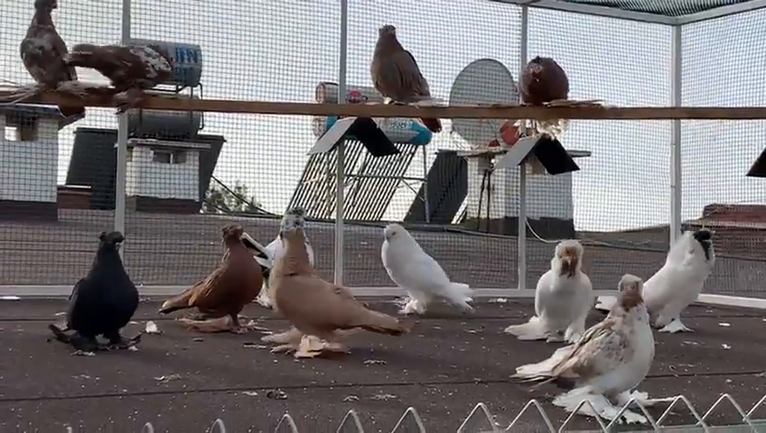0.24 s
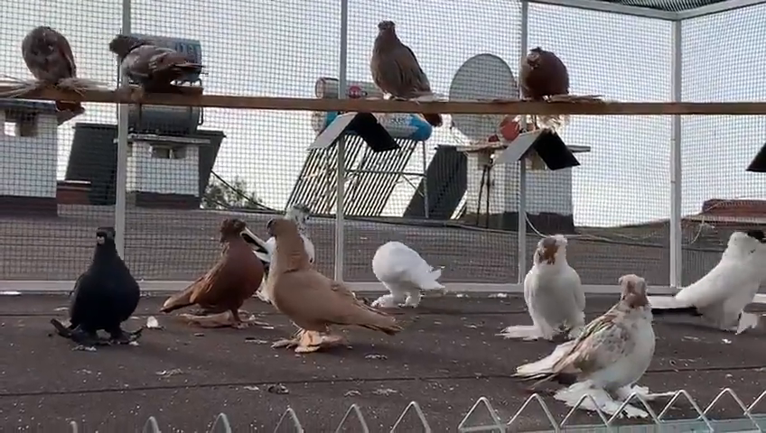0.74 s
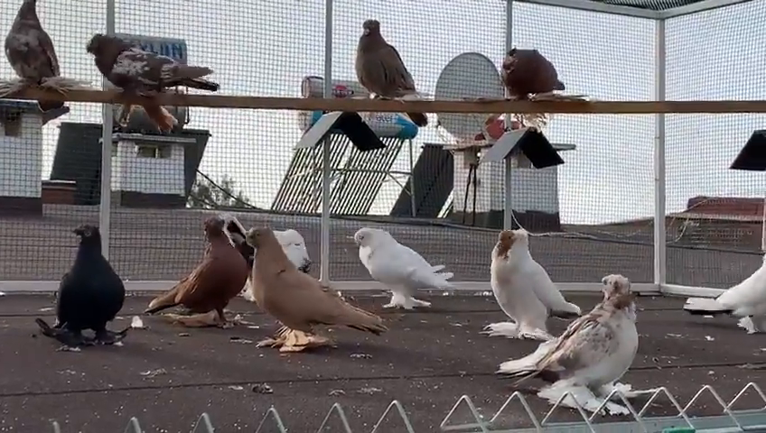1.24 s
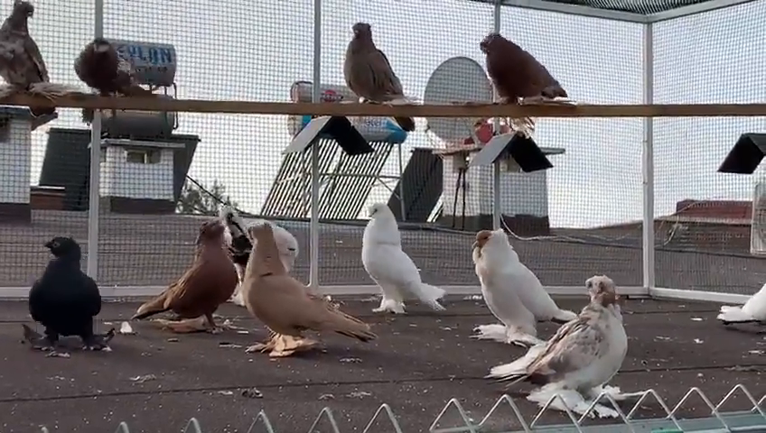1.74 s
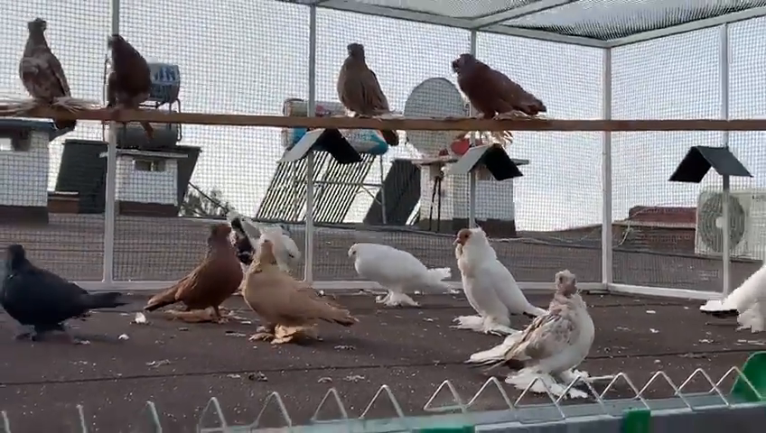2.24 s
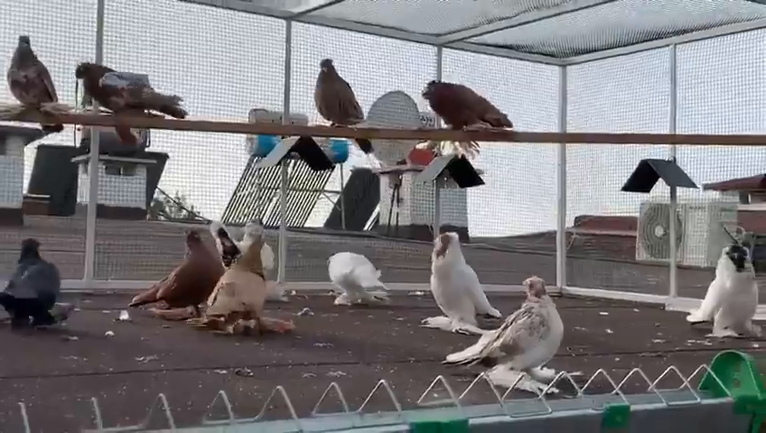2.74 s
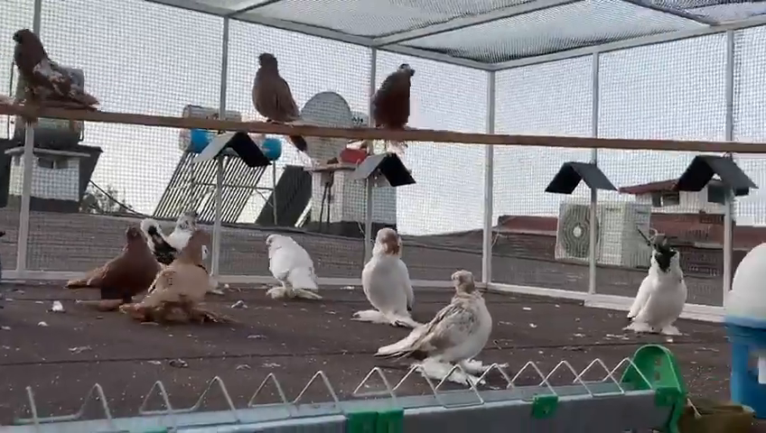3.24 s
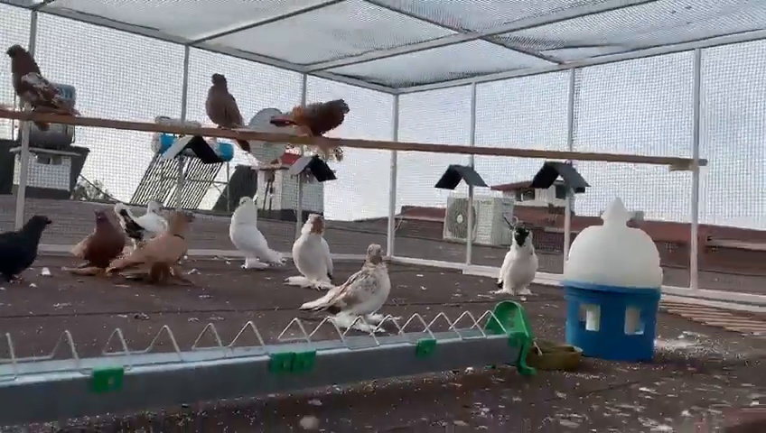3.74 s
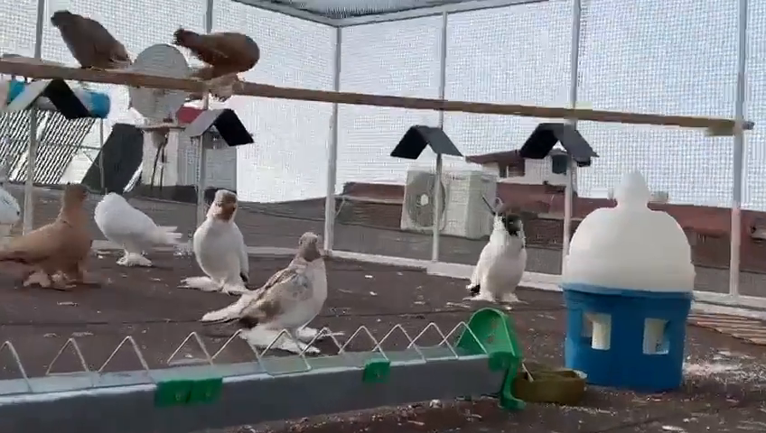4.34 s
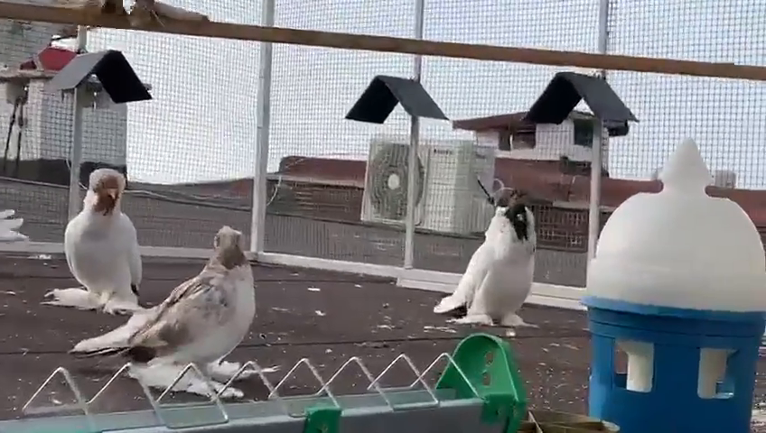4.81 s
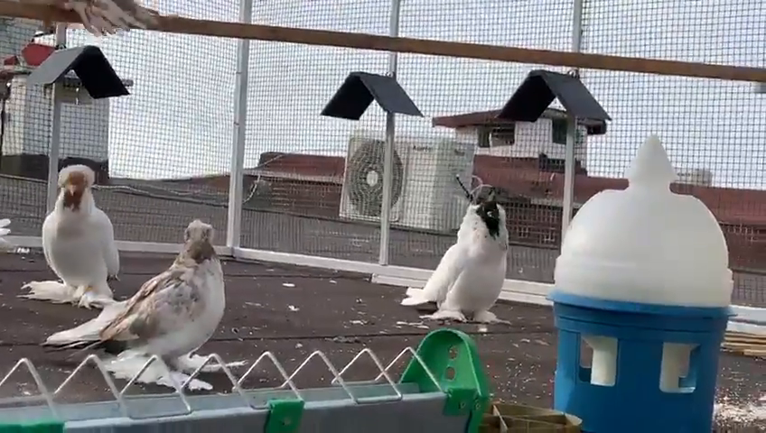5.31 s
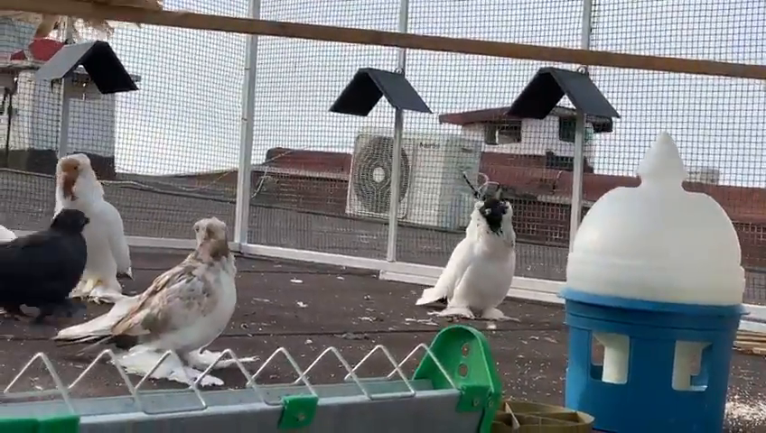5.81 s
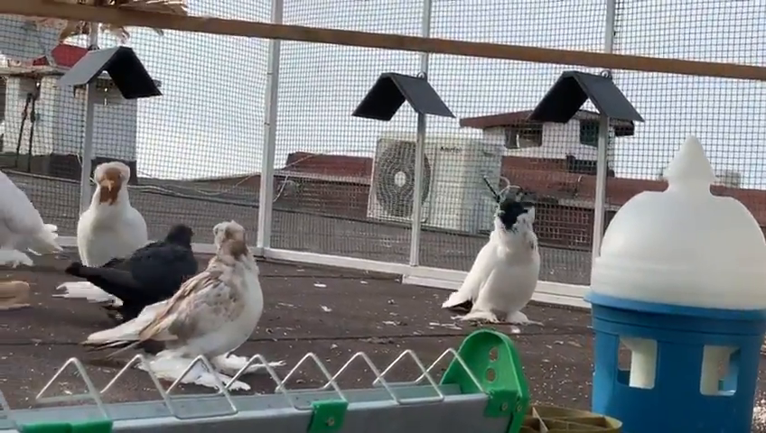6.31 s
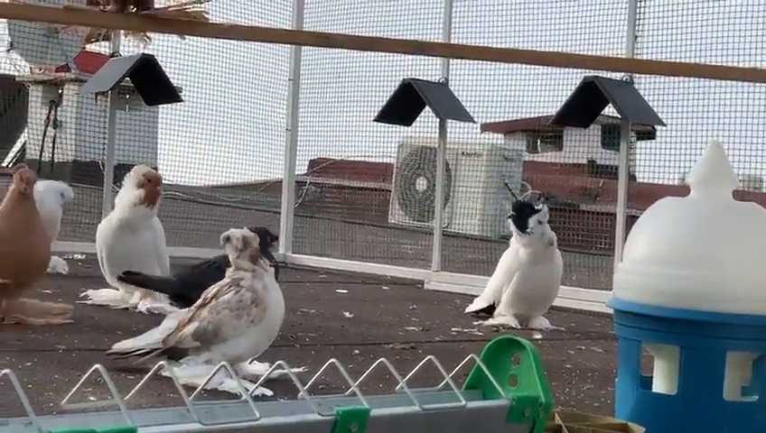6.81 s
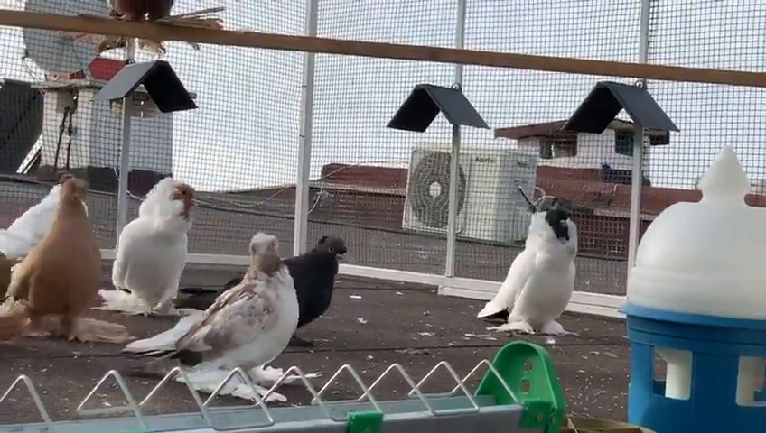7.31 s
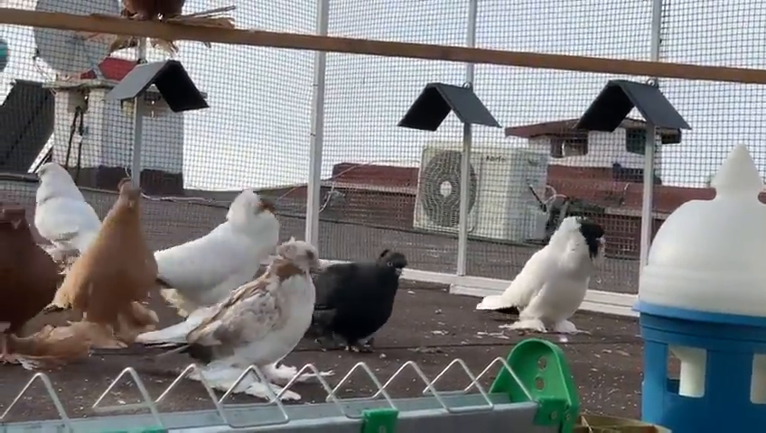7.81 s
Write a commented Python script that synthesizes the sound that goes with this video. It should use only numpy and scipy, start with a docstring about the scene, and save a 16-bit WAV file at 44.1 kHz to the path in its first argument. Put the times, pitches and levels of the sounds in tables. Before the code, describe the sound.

Pigeons coo close to a stereo microphone in a wire-mesh loft on a flat roof, with a town humming steadily below. A small bird chirps sharply at the start, off to the right among hard walls. From about 0.3 seconds claws tick faintly on the roofing and the cooing begins: short throat pulses and trembling, falling notes inside a rough, blurred murmur. Air softly thumps the microphone at 1.1 seconds, and the pulses run together into a rolling coo. One bird gives a brief, hoarse, rising squawk at 2.2 seconds. The cooing goes on in bouts to the end, with more rolls near 3.3, 5.4 and 7.6 seconds, the first two the strongest. A bright chirp stands out at 4.4 seconds and a weaker one at 5.5. Feet tap dully on the perch around 1.7, 2.9, 7 and 8 seconds, amid faint feather rustles and distant whistles.

```python
"""A wire-mesh pigeon loft on a flat roof, in stereo, close to the birds. From the start the town hums below
and small birds chirp among hard walls off to the right. Claws tick on the roofing, then the near pigeons coo:
short throat pulses and falling glides from the swollen crop, with a rough, blurred murmur around them.
A second in, air thumps the microphone and pulses run together into the first roll. Feet knock on the perch,
one bird squawks just after two seconds, and the cooing goes on in bouts to the end."""
import sys
import numpy as np
from scipy import signal
from scipy.fft import rfft, irfft
from scipy.io import wavfile

SR = 44100
rng = np.random.default_rng(int(sys.argv[2]) if len(sys.argv) > 2 else 0)


def put_to_file(sound):
    """Save the sound as 16-bit audio at rate SR, in the file named by the first command-line argument."""
    columns = np.atleast_2d(sound).T  # one column per channel
    safe = np.clip(columns, -1, 1)
    whole_steps = np.round(safe * 32767)
    wavfile.write(sys.argv[1], SR, whole_steps.astype(np.int16))


N = 355446

# the crop passes the octave of a low note and muffles that of a high one: octave_hz, gain_db
CROP_RESPONSE = [(400, -7), (500, -5.5), (600, -28.5), (720, -40), (820, -36), (1000, -53.5)]


def from_db(db):
    """Decibels to gain."""
    return 10 ** (np.asarray(db) / 20)


def rms_one(x):
    """Scaled to rms 1."""
    return x / np.sqrt(np.mean(x ** 2) + 1e-20)


def in_time(rows):
    """Curve columns at every sample."""
    time_s, *columns = np.transpose(rows)
    return [np.interp(np.arange(N) / SR, time_s, column) for column in columns]


def at_hz(points, hz):
    """A spectrum read on a log-frequency axis."""
    point_hz, values = np.transpose(points)
    return np.interp(np.log(hz), np.log(point_hz), values)


def add(out, start_s, piece):
    """Mixes a piece in from start_s on."""
    i = round(start_s * SR)
    piece = piece[max(-i, 0):max(N - i, 0)]
    out[max(i, 0):max(i, 0) + len(piece)] += piece


def filtered(x, hz, kind="low", order=2):
    """Butterworth filter."""
    return signal.sosfilt(signal.butter(order, hz, kind, fs=SR, output="sos"), x)


def wobble(size, rate_hz):
    """Low-passed noise of spread 1."""
    return rms_one(filtered(rng.standard_normal(size + 9000), rate_hz)[9000:])


def left_right(mid, side, alike):
    """A stereo pair whose channels are alike by a share from 0 to 1."""
    return np.sqrt(1 + alike) * mid + np.sqrt(1 - alike) * side * [[1], [-1]]


def from_right(pair):
    """Sound from the right reaches the microphone's left port 15 samples late."""
    return np.array([np.roll(pair[0], 15), pair[1]])


def echoes(x, t60_s, onset_s, alike):
    """Dense echoes: a stereo tail of noise that swells and dies."""
    t = np.arange(round(.8 * SR)) / SR
    mid, side = rng.standard_normal((2, len(t))) * from_db(-60 * t / t60_s) * (1 - np.exp(-t / onset_s))
    tails = rms_one(left_right(mid, side, alike)) / np.sqrt(len(t))
    return signal.fftconvolve(x[None], tails, axes=1)[:, :N]


def diffuse_noise(spectrum, drift_db):
    """Stereo noise shaped by a spectrum, its level drifting; rms 1."""
    # likeness of left and right: frequency_hz, share
    likeness = [(30, .75), (150, .8), (700, .7), (1200, .3), (3000, .45), (8000, .85)]
    hz = np.arange(1, N // 2 + 2) * SR / N
    mid, side = rfft(rng.standard_normal((2, N))) * from_db(at_hz(spectrum, hz))
    pair = irfft(left_right(mid, side, at_hz(likeness, hz)), N)
    return rms_one(pair * from_db(drift_db * wobble(N, rate_hz=2.67)))


def bursts(rows, half_width_s, fall, squareness, rise=0.0, linger=1.47, lift_db=0.0):
    """Tone bursts that start sharp, settle and may turn up at the end; squareness steepens their edges."""
    out, phases = np.zeros(N), rng.random(len(rows))
    widths = np.broadcast_to(half_width_s, len(rows))
    for (centre_s, peak_db, pitch_hz), width, first_phase in zip(rows, widths, phases):
        u = np.arange(-2.5, 4.5, 1 / SR / width)   # half widths from the centre
        settling = fall * np.exp(-3.2 * (u + 1)).clip(0, 2)
        upturn = rise * np.exp(4.8 * (u - linger)).clip(0, 2)
        hz = np.minimum(pitch_hz * (1 + settling + upturn), 740)
        phase = 2 * np.pi * (np.cumsum(hz) / SR + first_phase)
        octave_db = np.minimum(at_hz(CROP_RESPONSE, 2 * hz) + lift_db, -4)
        tone = np.sin(phase) + from_db(octave_db) * np.sin(2 * phase)
        envelope = np.exp(-np.abs(u / np.where(u > 0, linger, 1)) ** squareness)
        add(out, centre_s - 2.5 * width, from_db(peak_db) * envelope * tone)
    return out


def town():
    """The town below the roof: a low rumble, and a hiss from the right."""
    # drift of the town's loudness: time_s, rumble_db, hiss_db (before its boost)
    levels = [(0.0, -45.5, -65.5), (2.8, -47.5, -64.5), (5.7, -47.5, -69), (6.6, -47.5, -67.5),
              (7.74, -49, -70), (8.06, -48, -65.5)]
    # spectra of the rumble and the hiss: frequency_hz, relative_density_db
    rumble_spectrum = [(13, -49.5), (22, -22), (45, 3), (75, 4), (190, -4.5), (349, -6.5), (495, -15),
                       (623, -35.5), (700, -18), (910, -47.5), (1540, -120)]
    hiss_spectrum = [(290, -34.5), (500, -7), (527, -19.5), (579, -15.5), (680, -17.5), (767, -13),
                     (1620, -20), (2120, -23), (2810, -38), (4190, -29), (6260, -54), (7250, -68),
                     (8070, -53), (10300, -36), (12200, -56.5), (15900, -115), (22000, -120)]
    rumble_db, hiss_db = in_time(levels)
    hiss = from_db(hiss_db + 9.5) * diffuse_noise(hiss_spectrum, drift_db=.4)
    rumble = from_db(rumble_db) * diffuse_noise(rumble_spectrum, drift_db=1.0)
    return rumble + from_right(hiss)


def coo_murmur():
    """A rough, blurred purr of short random tones that swells with the near pigeons' cooing."""
    # swell of the murmur: time_s, level_db, top_pitch_hz
    murmur = [(0, -40.5, 601), (.25, -54, 703), (.5, -46.5, 734.4), (1.2, -53, 562), (1.6, -48, 716.6),
              (2.4, -59, 595.5), (2.8, -51, 699), (3.6, -50.5, 587), (3.9, -55, 578), (4.3, -51.5, 713),
              (4.8, -45.5, 611.4), (5.1, -60.5, 491), (5.7, -44.5, 557), (5.95, -71, 488), (6.4, -48, 695),
              (6.9, -56.5, 603), (7.46, -62, 503), (7.58, -47, 544), (7.93, -50, 545), (8.02, -68, 504)]
    lowest_hz, tones_per_s = 261.5, 110
    level_db, top_hz = in_time(murmur)
    when, pitch, strength, length = rng.random((round(tones_per_s * N / SR), 4)).T
    hz = lowest_hz + (top_hz[(when * N).astype(int)] - lowest_hz) * pitch
    rows = np.transpose([when * N / SR, 5 * strength, hz])
    tones = bursts(rows, half_width_s=.006 + .012 * length ** 2, fall=.1, squareness=2)
    return from_db(level_db) * rms_one(echoes(tones, t60_s=.18, onset_s=.023, alike=.69))


def shuffle():
    """Feathers and feet all about the microphone: half-octave noise bands that come and go on their own."""
    # rustle spectrum: centre_hz, level_db
    bands = [(900, -70.5), (1300, -69.5), (1900, -75.5), (2700, -74), (3800, -76), (5000, -84), (9500, -84)]
    out = np.zeros((2, N))
    for hz, level_db in bands:
        band = filtered(rng.standard_normal((2, N)), [hz / 1.2, hz * 1.2], "band")
        out += rms_one(band) * from_db(level_db + 4 * wobble(N, rate_hz=9.7))
    return out


def chirps():
    """Small birds' harsh whistles: the pitch slides to its held value while warbling fast and throbbing."""
    # whistles, before the walls:
    # start_s, length_s, first_hz, held_hz, level_db, octave_db, upper_partials_db, warble_share
    whistles = [(-.05, 0.088, 4790, 4770, -33, -17.5, -42, 0.02),
                (0.043, 0.095, 3200, 3330, -41.5, -24, -50, 0.038),
                (6.4, 0.5, 4240, 4180, -67.5, -34, -42, 0.072),
                (3.587, 0.42, 4310, 4250, -68, -42, -44, 0.16),
                (4.398, 0.06, 5700, 5820, -52, -53, -35, 0.017),
                (4.39, .05, 4700, 4800, -54, -40, -40, .04),
                (4.409, 0.1, 3696, 4200, -31, -22.5, -14, 0.03),
                (4.447, 0.065, 4940, 5120, -53.5, -50, -41, 0.013),
                (4.497, 0.076, 3250, 3300, -54, -46, -40, 0.033),
                (5.476, 0.06, 4220, 4020, -48.5, -19.5, -45, 0.035)]
    out = np.zeros(N)
    for start_s, length_s, first_hz, held_hz, level_db, octave_db, upper_db, warble in whistles:
        u = np.arange(0, 1, 1 / SR / length_s)
        hz = held_hz + (first_hz - held_hz) * np.exp(-4 * u)
        hz *= 1 + warble * np.minimum(3 * u, 1) * wobble(len(u), rate_hz=130)
        phase = 2 * np.pi * np.cumsum(hz) / SR
        octave = from_db(octave_db) * np.minimum(4 * u, 1) * np.sin(2 * phase)
        upper = from_db(upper_db) * (np.sin(3 * phase) + .6 * np.sin(4 * phase))
        envelope = from_db(level_db + 2.06 * wobble(len(u), rate_hz=150)) * np.sin(np.pi * u) ** .35
        add(out, start_s, envelope * (np.sin(phase) + octave + upper))
    return out


def among_walls(calls):
    """Calls heard from a distance among hard walls: direct sound, strong early echoes, a faint late wash."""
    dull = filtered(calls, 4800, order=4)   # far walls return less treble
    early = echoes(calls, t60_s=.25, onset_s=.0017, alike=.019)
    late = echoes(dull, t60_s=.65, onset_s=.25, alike=.067)
    return from_db(-3.5) * calls + early + from_db(-17) * late


def claw_ticks():
    """Claws and feathers on the roofing: bright noise, from sharp ticks to soft rustles."""
    # scratches: centre_s, peak_db (before the high-pass), spread_s
    scratches = [(0.283, -59, 0.016), (0.36, -49.5, 0.0012), (0.989, -56, 0.0037), (1.448, -62, 0.026),
                 (2.045, -59, 0.0095), (2.891, -54.5, 0.0065), (3.258, -59.5, 0.013), (4.716, -62, 0.0055),
                 (5.229, -51, 0.0034), (5.247, -52.5, 0.0069), (5.388, -55, 0.0034), (5.748, -59, 0.035),
                 (5.965, -51.5, 0.0038), (6.6, -59, 0.02), (7.869, -56.5, 0.017)]
    out, t = np.zeros(N), np.arange(-.06, .06, 1 / SR)
    for centre_s, peak_db, spread_s in scratches:
        envelope = from_db(peak_db + 3 * wobble(len(t), rate_hz=90)) * np.exp(-(t / spread_s) ** 2)
        add(out, centre_s + t[0], envelope * rng.standard_normal(len(t)))
    restless_feet = from_db(-83 + 4 * wobble(N, rate_hz=30) + 5 * wobble(N, rate_hz=6))
    bright = filtered(out + restless_feet * rng.standard_normal(N), 2500, "high")
    return bright + from_db(-7.5) * echoes(bright, t60_s=.24, onset_s=.0052, alike=.17)


def throat_pulses():
    """Single pulses from a near pigeon's throat, each an abrupt tone burst that drops in pitch."""
    # pulses: centre_s, peak_db, pitch_hz
    pulses = [(0.345, -29.5, 333), (0.382, -38.5, 562), (0.43, -32.5, 356), (0.506, -32, 370),
              (0.557, -32, 430), (0.589, -39.5, 610), (0.764, -35, 540), (1.052, -35, 295),
              (1.13, -36, 288), (1.549, -43, 580), (1.599, -33, 330), (1.684, -30, 345), (1.77, -29.5, 372),
              (1.797, -44, 555), (2.486, -39, 324), (2.721, -36, 300), (2.776, -29.5, 356.5),
              (2.854, -29.5, 354), (2.933, -33, 364), (2.958, -45, 572), (3.007, -40.5, 257),
              (3.075, -35.5, 287), (3.139, -27, 385), (3.997, -37.5, 460), (4.125, -33, 382),
              (4.174, -30, 349), (4.246, -28, 364), (4.331, -29, 363), (4.349, -31.5, 446),
              (4.669, -40.5, 560), (4.742, -36.5, 403), (5.008, -37.5, 265), (5.133, -39, 302),
              (5.201, -34.5, 271), (5.283, -31.5, 286.5), (5.787, -34.5, 333), (6.373, -29.5, 333),
              (6.45, -28, 361.3), (6.53, -29, 339.6), (7.157, -34, 297), (7.289, -33.5, 293.5),
              (7.412, -35.5, 272)]
    return bursts(pulses, half_width_s=.0068, fall=.502, squareness=5, rise=.26, linger=1.15, lift_db=11.5)


def coos():
    """Trembling tones from the swollen crop: the pitch settles fast, then sags, turning husky as it sinks."""
    # held coos: start_s, length_s, first_hz, settled_hz, last_hz, swell_s, peak_db, last_db,
    # slump_power (under 1 sags early, over 1 late), octave_lift_db
    glides = [(0.568, 0.175, 390, 335, 250, 0.015, -33, -42, 2.2, 0.11),
              (0.74, 0.22, 250, 250, 205, 0.004, -43, -49, 1.1, 0.11),
              (0.66, 0.3, 690, 510, 410, 0.09, -38, -34.5, 1.07, 0.1),
              (0.791, 0.35, 428.4, 395, 293.5, 0.013, -40, -49.5, 1.18, 0.086),
              (1.478, .16, 343.5, 305, 216.5, 0.0084, -33.5, -45.5, 1.86, 3.2),
              (1.904, 0.32, 630, 380.7, 272.3, 0.022, -34, -54, 1.71, 0.1),
              (3.028, 0.11, 701, 688, 469, .11, -42.5, -51, 1.6, 0.1),
              (3.128, 0.19, 431.5, 411.5, 333, 0.014, -29.5, -44.5, 0.74, 0.1),
              (3.392, 0.3, 349.8, 363.2, 214.2, 0.0072, -31, -49.5, 0.86, 0.081),
              (4.352, 0.24, 372, 276, 215.3, .012, -47.5, -57, 0.8, 0.1),
              (4.371, 0.32, 609, 600, 298.6, 0.21, -31, -48.5, 1, 0.1),
              (4.469, .15, 676.3, 520.3, 397.8, 0.052, -35.5, -40, 0.88, 0.1),
              (4.66, 0.31, 606, 570, 440.3, 0.019, -54, -51, 0.93, 0.1),
              (4.668, 0.163, 337, 285, 234.5, .012, -51, -58, 0.88, 0.1),
              (5.575, .3, 339.5, 325, 214.5, 0.018, -32, -47.5, 0.92, 2.7),
              (6.052, 0.33, 554.4, 309.8, 195, .03, -34.5, -53, 1.09, 0.1),
              (6.159, 0.39, 568.7, 527.7, 302.3, 0.12, -35, -46.5, 1.05, 0.1),
              (6.651, 0.098, 695, 688, 392, 0.092, -35, -30, 1.22, 0.1),
              (6.742, 0.054, 450, 450, 362, 0.0066, -32.5, -41, 1.2, 0.086),
              (6.79, 0.08, 597, 575, 525, 0.014, -45.5, -52, 1.1, 0.1),
              (6.775, 0.22, 250.5, 376, 279.4, 0.027, -40.5, -51.5, 1.82, 21.5),
              (7.508, .026, 500, 490, 460, .004, -37, -39, 1.1, .1),
              (7.6, .15, 520, 490.4, 459.2, .03, -47.5, -43, 1.04, 0.1),
              (7.765, 0.211, 302.7, 287.5, 225.8, 0.015, -41, -51, 1.204, 6.2)]
    settle_s, release_s, husky_hz, clear_hz = .035, .0038, 230, 380
    out = np.zeros(N)
    for start_s, length_s, first_hz, settled_hz, last_hz, swell_s, peak_db, last_db, slump, lift_db in glides:
        t = np.arange(0, length_s, 1 / SR)
        hz = settled_hz + (last_hz - settled_hz) * (t / length_s) ** slump
        hz += (first_hz - settled_hz) * np.exp(-t / settle_s)
        husk = np.interp(hz, [husky_hz, clear_hz], [1, 0])
        tremor = (.016 + .018 * husk) * wobble(len(t), rate_hz=40)
        phase = 2 * np.pi * (np.cumsum(hz * (1 + tremor)) / SR + rng.random())
        octave_db = np.minimum(at_hz(CROP_RESPONSE, 2 * hz) + lift_db, 1.5)
        tone = np.sqrt(2) * (np.sin(phase) + from_db(octave_db) * np.sin(2 * phase))
        fade = np.clip((t - swell_s) / max(length_s - swell_s, 1e-9), 0, 1) ** slump
        level_db = peak_db + (last_db - peak_db) * fade + 1.8 * wobble(len(t), rate_hz=30)
        rasp_db = 3 * husk * wobble(len(t), rate_hz=110)
        edges = np.minimum(t / swell_s, 1) ** .87 * np.clip((length_s - t) / release_s, 0, 1)
        add(out, start_s, from_db(level_db + rasp_db) * edges * tone)
    return out


def air_thumps():
    """Air bumps the microphone: low bursts of a few cycles."""
    # thumps: centre_s, peak_db, pitch_hz
    thumps = [(1.11, -33, 64.5), (1.13, -36, 79.5), (1.155, -32.5, 56), (1.18, -38, 125),
              (1.797, -40, 116.5)]
    return bursts(thumps, half_width_s=.00923, fall=.14, squareness=1.4)


def rolls():
    """Rounder throat pulses, so close that they run together."""
    # pulses of the rolls: onset_s, peak_db, pitch_hz
    pulses = [(1.238, -27, 315), (1.273, -31, 301), (1.303, -33.5, 315), (1.335, -30, 323),
              (1.364, -28.5, 314), (1.392, -33, 304), (1.416, -30, 302), (1.443, -27, 317),
              (1.466, -28.5, 345), (3.22, -28, 324.7), (3.25, -29, 356), (3.278, -26.5, 335.3),
              (3.299, -30, 312.5), (3.325, -24.5, 333.4), (3.347, -28, 347), (3.373, -23, 349),
              (3.391, -27, 344), (3.433, -28.5, 328), (3.457, -27.5, 314), (5.327, -27, 320),
              (5.358, -29, 298), (5.39, -27.5, 321.5), (5.424, -27.5, 310), (5.449, -23, 328),
              (5.472, -25, 319.4), (5.493, -25, 323), (5.512, -27, 331.5), (5.537, -25, 318),
              (5.553, -25.5, 325), (5.579, -23.5, 329.3), (7.529, -32, 320), (7.566, -31.5, 311),
              (7.601, -36, 377), (7.63, -36, 327), (7.653, -32, 302), (7.683, -33.5, 311),
              (7.709, -33, 303), (7.732, -34.5, 272), (7.755, -31, 273.4)]
    rise_s = .00579
    centred = [(onset_s + rise_s, peak_db, hz) for onset_s, peak_db, hz in pulses]
    return bursts(centred, half_width_s=.0072, fall=.291, squareness=2.4, rise=.091, linger=1.49, lift_db=6.5)


def far_calls():
    """Small birds farther off, each call a faint whistle on one even, warbling slide."""
    # slides, before the walls: start_s, length_s, first_hz, last_hz, level_db
    slides = [(1.293, 0.13, 3970, 2940, -58), (3.075, 0.043, 2490, 2640, -57.5),
              (4.088, 0.061, 4700, 4450, -58), (4.124, 0.085, 3430, 2690, -57),
              (7.077, 0.037, 2890, 2550, -63), (7.126, .09, 2790, 2550, -66),
              (7.282, 0.054, 4100, 3530, -62), (7.29, 0.055, 2700, 2620, -63.5),
              (7.781, 0.056, 4680, 4380, -57.5), (7.822, .07, 3380, 2760, -56)]
    out = np.zeros(N)
    for start_s, length_s, first_hz, last_hz, level_db in slides:
        u = np.arange(0, 1, 1 / SR / length_s)
        hz = (first_hz + (last_hz - first_hz) * u) * (1 + .05 * wobble(len(u), rate_hz=110))
        add(out, start_s, from_db(level_db) * np.sin(np.pi * u) * np.sin(2 * np.pi * np.cumsum(hz) / SR))
    return out


def perch_knocks():
    """Feet tap the perch: dull, fast-dying puffs of midrange noise."""
    # footfalls: start_s, relative_db
    footfalls = [(1.71, -54), (2.889, -55), (6.872, -57), (7.082, -62), (8.02, -54)]
    out, t = np.zeros(N), np.arange(0, .08, 1 / SR)
    for start_s, relative_db in footfalls:
        add(out, start_s, from_db(relative_db) * rng.standard_normal(len(t)) * np.exp(-t / .017))
    return from_db(13.5) * filtered(out, [700, 2800], "band")


def squawk():
    """One hoarse rising call; as odd partials set in, its cycles alternate strong and weak."""
    # the call, before the walls: start_s, length_s, first_hz, held_hz, level_db, warble_share
    call = (2.155, .105, 1000, 1375, -42, .028)
    # its partials: multiple, gain_db
    partials = [(2, 0), (3, -8), (4, 6), (5, 7), (6, -5), (7, -7)]
    start_s, length_s, first_hz, held_hz, level_db, warble = call
    out, u = np.zeros(N), np.arange(0, 1, 1 / SR / length_s)
    hz = (held_hz + (first_hz - held_hz) * np.exp(-5 * u)) * (1 + warble * wobble(len(u), rate_hz=170))
    phase = 2 * np.pi * np.cumsum(hz) / SR
    odd_gain = np.clip(4 * (u - .33), .2, 1)
    tone = sum(from_db(gain_db + 4 * wobble(len(u), rate_hz=350)) * odd_gain ** (k % 2) * np.sin(k * phase)
               for k, gain_db in partials)
    add(out, start_s, from_db(level_db) * np.sin(np.pi * u) ** .8 * tone)
    return out


def scene():
    """Near pigeons with their murmur and a few reflections, small birds and feet from the right, town below."""
    # where the pigeons stand as the microphone turns: time_s, left_minus_right_db
    balance = [(0, .5), (4.0, 1.4), (5.3, 3), (6.2, 0.8), (6.8, 3.8), (8.06, -0.5)]
    bed = town() + coo_murmur() + shuffle()
    small_birds = among_walls(chirps() + far_calls() + squawk())
    feet = claw_ticks() + perch_knocks()
    pigeons = throat_pulses() + coos() + rolls()
    direct = pigeons * from_db(in_time(balance)[0] * [[.5], [-.5]])
    reflected = from_db(-10.5) * echoes(pigeons, t60_s=.18, onset_s=.0027, alike=.15)
    return bed + from_right(small_birds + feet) + direct + reflected + air_thumps()


def record(dry):
    """The top is cut steeply, 70 dB down from 12.3 kHz."""
    return signal.sosfilt(signal.cheby2(12, 70, 12300, fs=SR, output="sos"), dry)


dry = scene()
out = record(dry)
put_to_file(out)
```